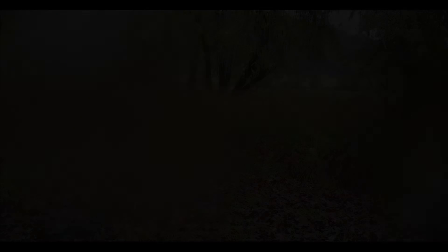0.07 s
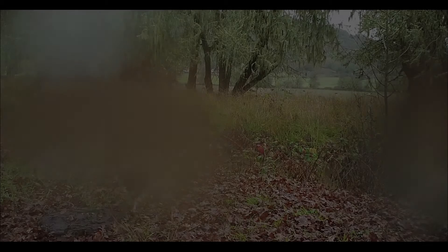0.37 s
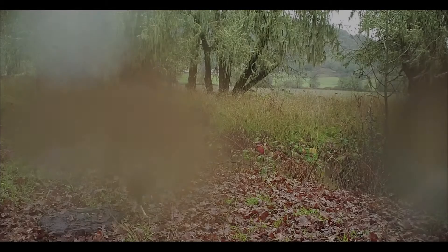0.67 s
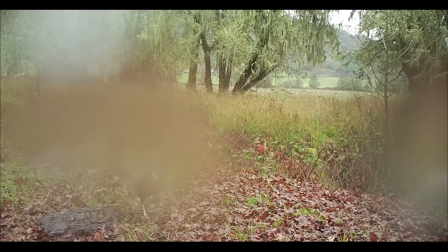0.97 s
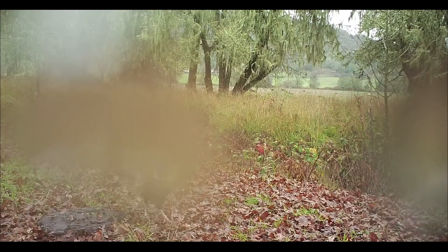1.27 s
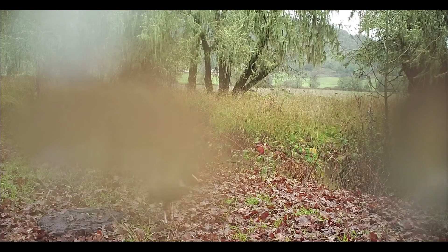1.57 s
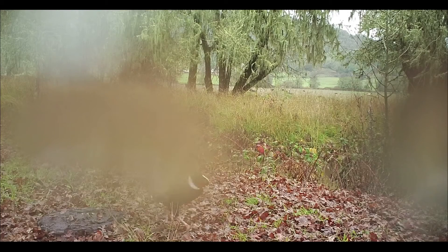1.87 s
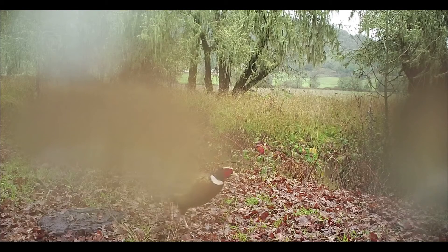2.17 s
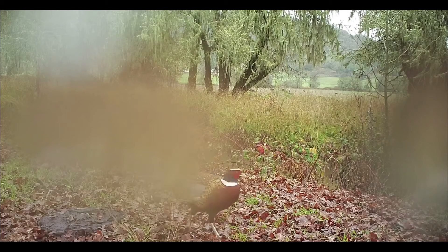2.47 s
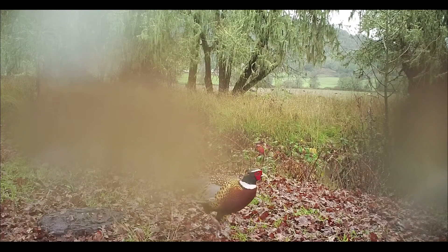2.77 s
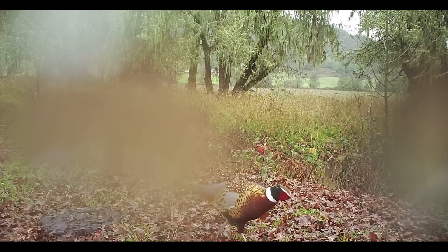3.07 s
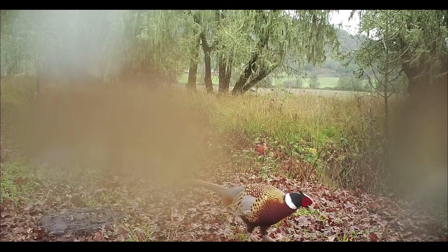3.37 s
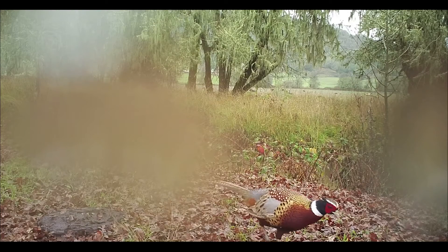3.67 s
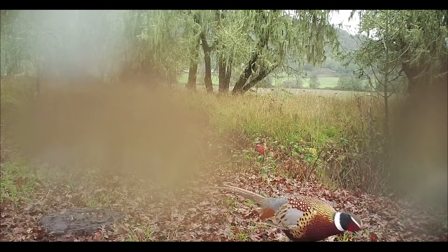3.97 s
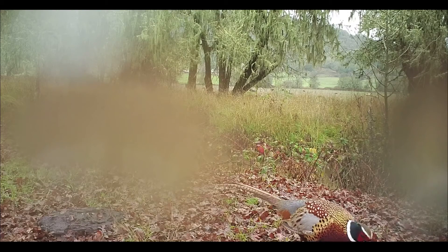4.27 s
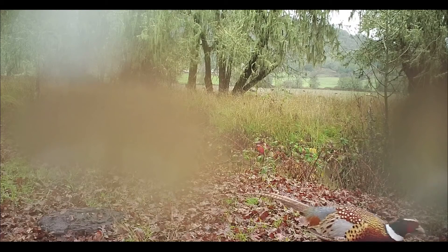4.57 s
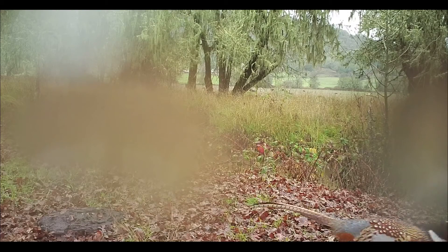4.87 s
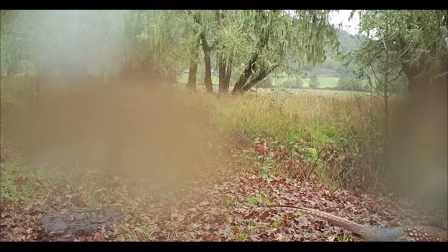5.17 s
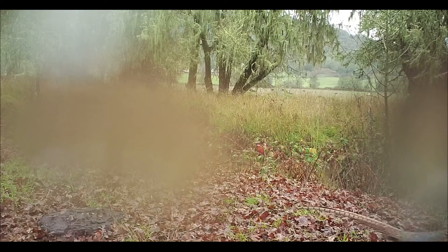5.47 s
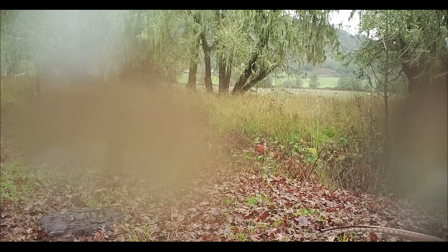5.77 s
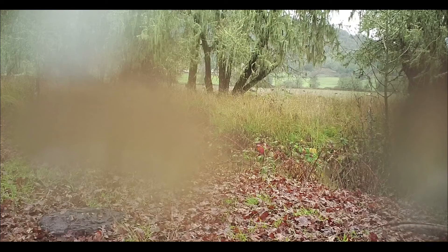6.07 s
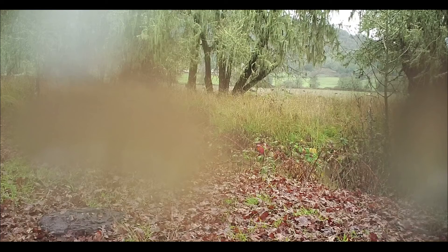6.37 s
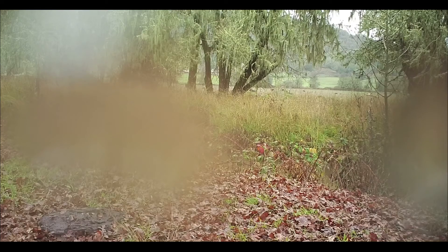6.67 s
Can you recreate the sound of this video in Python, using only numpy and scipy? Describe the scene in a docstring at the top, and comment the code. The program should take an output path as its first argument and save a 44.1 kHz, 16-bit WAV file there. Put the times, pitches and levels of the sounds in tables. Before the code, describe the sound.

At the quiet edge of a wood, an even hiss and a low, distant rumble fade in. Small, sharp ticks of leaves and drips come irregularly from all round. A pheasant picks its way through the fallen leaves, adding brief, soft rustles and occasional short knocks on twigs. A small bird gives a few very faint, thin chirps far off. The ticks and crackles sit mostly to the right.

```python
"""At the quiet, damp edge of a wood, a pheasant picks its way through fallen leaves.
Its steps rustle the leaves and knock on twigs. Small ticks come from all round, as leaves
snap or are hit by drips and ring briefly. Behind them are a small bird, a far rumble and an even hiss.
The camera's right microphone opening is the more sensitive one and rings near 6 kHz.
Its electronics whine faintly, and the sound fades in."""
import sys
import numpy as np
from scipy import signal
from scipy.fft import rfft, irfft
from scipy.io import wavfile

SR = 44100
rng = np.random.default_rng(int(sys.argv[2]) if len(sys.argv) > 2 else 0)


def persist_wave(psi):
    """Save psi, clipped to +-1, as 16-bit WAV."""
    counts = np.round(np.clip(psi, -1, 1) * 32767).astype(np.int16)
    wavfile.write(sys.argv[1], SR, np.atleast_2d(counts).T)


N = 301644
TIME = np.arange(N) / SR


def from_db(db):
    """Turn decibels into a number to multiply by."""
    return 10 ** (np.asarray(db) / 20)


def rms_one(x):
    """Scale a sound so that its average strength (rms) is 1."""
    return x / np.sqrt(np.mean(x ** 2) + 1e-20)


def energy_one(x):
    """Scale each channel so that its total energy is 1."""
    return x / np.linalg.norm(x, axis=1, keepdims=True)


def at_hz(points, hz, column=1):
    """Read a table between its frequencies, with all octaves equally wide."""
    table = np.array(points)
    return np.interp(np.log(hz), np.log(table[:, 0]), table[:, column])


def hump(middle_s, length_s):
    """A smooth rise and fall of height 1."""
    return np.exp(-np.pi * ((TIME - middle_s) / length_s) ** 2)


def drift(rate_hz):
    """A smooth random wobble of typical size 1."""
    step, warm_up = 40, 2000
    r = np.exp(-2 * np.pi * rate_hz * step / SR)
    noise = rng.standard_normal(N // step + warm_up + 2)
    slow = signal.lfilter([1], [1, -2 * r, r * r], noise)[warm_up:]
    return np.interp(np.arange(N) / step, np.arange(len(slow)), rms_one(slow))


def resonance(x, hz, width_hz):
    """Keep the sound near one pitch; the narrower the width, the longer it rings."""
    r = np.exp(-np.pi * width_hz / SR)
    angle = 2 * np.pi * min(hz, .45 * SR) / SR
    feedback = [1, -(1 + r * r) * np.cos(angle), r * r]
    return signal.lfilter(np.array([1, 0, -1]) * (1 - r * r) / 2, feedback, x + 1e-18)


def ring(x, hz, width_hz):
    """The same resonance twice, so less gets through on either side of the pitch."""
    return resonance(resonance(x, hz, width_hz), hz, width_hz)


def crackle(per_s, spread_db, low_hz, high_hz, damping, leaves=10):
    """Countless tiny snaps of uneven size, shared among leaves of different pitch."""
    sizes = from_db(spread_db * np.minimum(rng.exponential(1, N), 3)) * rng.choice([-1, 1], N)
    happens = rng.random(N) < per_s / SR
    snaps = sizes * happens * from_db(2 * rng.standard_normal((2, N)))   # each leans left or right
    which_leaf, out = rng.integers(0, leaves, N), np.zeros((2, N))
    for k, hz in enumerate(np.geomspace(low_hz, high_hz, leaves)):
        left, right = ring(snaps * (which_leaf == k), hz, damping * hz) * (low_hz / hz) ** .5
        out += [np.roll(left, k % 4 - 1), right]   # a tiny time shift gives the leaf a direction
    return np.array([rms_one(side) for side in out])


def air(left_db, right_db, rumble_hz, churn_db):
    """An even hiss and a far rumble that wavers and swells once in a gust."""
    # tone of the far noise: (frequency [Hz], relative left level [dB], relative right level [dB])
    spectrum = [(11.6, -77, -63), (19.3, -89, -63), (34.2, -69, -72.5), (57, -77.5, -69.5),
                (99.6, -80.5, -80), (167.6, -89.5, -85.5), (408, -94.5, -88), (1060, -97, -91.5),
                (2220, -100, -94), (4630, -102, -96), (6200, -103, -91.5), (9140, -104, -101),
                (15600, -105, -104)]
    # how alike the two sides are: (frequency [Hz], likeness [0 to 1])
    likeness = [(20, 0.093), (70, 0.61), (140, 0.83), (300, 0.32), (1400, 0.32), (5000, 0.17),
                (14000, 0.53)]
    hz = np.maximum(np.arange(N // 2 + 1) * SR / N, 1)
    shared, opposed = rfft(rng.standard_normal((2, N)))
    alike = at_hz(likeness, hz)
    noise = np.sqrt(1 + alike) * shared + np.sqrt(1 - alike) * opposed * [[1], [-1]]
    levels_db = [at_hz(spectrum, hz, column=1) + left_db, at_hz(spectrum, hz, column=2) + right_db]
    noise *= from_db(levels_db) * np.sqrt(SR) / 2
    bass = np.exp(-(hz / rumble_hz) ** 2)
    gust_db = 2.5 * hump(middle_s=1.15, length_s=1.2)
    rumble = irfft(noise * bass, N) * from_db(gust_db + churn_db * drift(11.8))
    hiss = irfft(noise * (1 - bass), N)
    return rumble + hiss


def whine(left_db, right_db, waver_hz):
    """The electronics give off two close, slightly unsteady high tones."""
    # tones of the electronics: (pitch [Hz], relative level [dB])
    tones = [(9799, -80), (9861, -80)]
    out = np.zeros(N)
    for hz, db in tones:
        pitch = hz + waver_hz * drift(17)
        out += from_db(db) * np.sqrt(2) * np.sin(2 * np.pi * np.cumsum(pitch) / SR)
    return out * from_db([[left_db], [right_db]])


def patter(level_db, left_db, waver_db):
    """Faint ticks from farther off never quite stop."""
    snaps = crackle(per_s=300, spread_db=1.6, low_hz=5500, high_hz=11300, damping=0.45)
    return snaps * from_db(waver_db * drift(14.4)) * from_db([[level_db + left_db], [level_db]])


def ticks(rows, level_db, size=1024):
    """A snap makes a leaf ring, with a dry crack on top; smaller slips follow as it settles."""
    left_db, left_spread_db = -8.5, 4.5   # left compared with right, and how much that varies
    settle_db, settle_s = -8, .002
    crack_shadow = from_db([[-10], [0]])   # less of the bright crack reaches the left side
    out, age = np.zeros((2, N + size)), np.arange(size) / SR
    for s, db, hz, width_hz, crack_db in rows:
        pan_db = left_db + left_spread_db * rng.standard_normal()
        slips = rng.standard_normal((2, size)) ** 3 * np.exp(-age / settle_s)
        force = from_db(settle_db) * energy_one(slips)
        force[:, 0] += 1   # the snap itself
        crack = energy_one(ring(force, hz=11600, width_hz=6900)) * crack_shadow
        leaf = energy_one(ring(np.roll(force, shift=4, axis=1), hz, width_hz))   # just after the crack
        start = min(int(s * SR), N)
        out[:, start:start + size] += (leaf + from_db(crack_db) * crack) * from_db([[db + pan_db], [db]])
    return from_db(level_db) * out[:, :N]


def soft_ticks(level_db, per_s, leaf_hz, width_hz, count=120):
    """Smaller leaves and drips tick at random moments and pitches."""
    times = np.cumsum(rng.exponential(1, count)) / per_s
    pitches = leaf_hz * 2 ** rng.uniform(-0.85, 0.5, count)
    return ticks([(s, 0, hz, width_hz, 0) for s, hz in zip(times, pitches)], level_db)


def leaf_snaps(level_db):
    """The loudest leaves snap one by one, each with its own short ring."""
    # snapping leaves: (time [s], relative level [dB], pitch [Hz], ring width [Hz], crack over ring [dB])
    snaps = [(0.3404, -28.5, 6500.0, 4000.0, -7.0), (0.4626, -29.5, 6200.0, 4000.0, -3.0),
             (0.7221, -32, 6800.0, 4000.0, -4.0), (0.7681, -35, 4500.0, 6000.0, -13.0),
             (0.8029, -30.5, 7500.0, 6000.0, 0), (0.8801, -30.5, 7000.0, 2500.0, -4.0),
             (1.0285, -37, 7500.0, 3000.0, -8.0), (1.2033, -33, 6000.0, 6000.0, 2),
             (1.3505, -40, 6000.0, 2500.0, -3.0), (1.5082, -33.5, 6733, 4000.0, -4.0),
             (1.5167, -35.5, 6750.0, 2500.0, -10.0), (1.5289, -28.0, 5260, 4000.0, -1),
             (1.6058, -30.5, 4000.0, 6000.0, -5), (1.6393, -34.5, 5750.0, 4000.0, -16.0),
             (1.6459, -32, 6000.0, 2500.0, -7.0), (1.6604, -35, 5500.0, 6000.0, -7.0),
             (1.6661, -38, 6250.0, 6000.0, -7.0), (1.7552, -34.5, 7000.0, 2500.0, -16.0),
             (1.907, -35, 6500.0, 6000.0, -16.0), (2.0414, -29.5, 5900.0, 6000.0, -1),
             (2.2675, -24.5, 6140, 5050, -8.0), (2.3894, -28.5, 5700.0, 3500.0, -3.0),
             (2.4073, -37, 7250.0, 6000.0, -16.0), (2.4375, -38, 7800.0, 1200.0, -12.0),
             (2.4957, -31, 5750.0, 4000.0, -4.0), (2.5034, -28, 7550, 3470, -3),
             (2.5294, -33, 5000.0, 1500.0, -10.0), (2.6905, -33, 7500.0, 6000.0, -4.0),
             (2.716, -30.5, 6300.0, 2500.0, -5.0), (2.7604, -29, 8000.0, 6000.0, -10.0),
             (2.8289, -35, 5014, 1500.0, 2), (2.8591, -35, 5500.0, 2500.0, -10.0),
             (2.8968, -35, 6100, 1500.0, 5), (3.0274, -35, 6750.0, 4000.0, -1.0),
             (3.4317, -31, 7250.0, 6000.0, -7.0), (3.5002, -31.0, 4258, 4000.0, -4.0),
             (3.5175, -32.5, 6000.0, 3000.0, -12.0), (3.6075, -32.5, 6000.0, 6000.0, -8.0),
             (3.6979, -33, 6500.0, 2000.0, -3.0), (3.876, -31, 5247, 6000.0, -10.0),
             (3.9079, -29.5, 6200.0, 4500.0, -2), (4.021, -32, 8600, 4000.0, -7.0),
             (4.2024, -30, 6400.0, 3000.0, -6), (4.4131, -28.5, 6200.0, 1500.0, -2),
             (4.4399, -30.5, 6200, 1500.0, -4.0), (4.4752, -36, 5750.0, 4012, -4.0),
             (4.5399, -30, 4000.0, 6000.0, -16.0), (4.5457, -30.5, 6000.0, 6000.0, -10.0),
             (4.5694, -32, 8500.0, 5000.0, -11.0), (4.5852, -34.0, 6250.0, 4000.0, -10.0),
             (4.6359, -31.5, 4000.0, 2500.0, -1), (4.7162, -32, 8538, 6000.0, -2.0),
             (4.7958, -33, 6500.0, 6000.0, -16.0), (4.8907, -27, 5100, 4000.0, -1),
             (5.0899, -33.0, 8000.0, 5000.0, -1.0), (5.1095, -31, 7200, 4017, -16.0),
             (5.1373, -34, 9290, 900.0, 1.0), (5.1638, -32, 6700, 4000.0, -1.0),
             (5.1823, -31.5, 6000.0, 4000.0, -7.0), (5.1995, -35.5, 6000.0, 6000.0, -4.0),
             (5.2641, -27.5, 8100, 4008, -2), (5.3486, -33.5, 6000.0, 2500.0, -6.0),
             (5.3831, -37, 7250.0, 2500.0, 1), (5.4191, -27, 6823, 4000.0, 0),
             (5.4969, -37.0, 6470, 900.0, -12.0), (5.5527, -35, 6900, 2500.0, -6),
             (5.6038, -43, 7750.0, 6000.0, -16.0), (5.6301, -36.0, 7000.0, 6000.0, -13.0),
             (5.6421, -39, 5250.0, 6000.0, -10.0), (5.7481, -38, 6250.0, 4000.0, -16.0),
             (5.7569, -32.0, 7650, 6024, -6), (5.821, -29, 4800.0, 2500.0, -10.0),
             (5.9316, -30.5, 7500.0, 6000.0, -16.0), (5.9663, -31, 8000.0, 4000.0, -4.0),
             (5.9791, -30, 6300, 2000.0, -10.0), (6.2437, -34, 6623, 4000.0, -14.0),
             (6.2593, -37, 6250.0, 4000.0, -13.0), (6.3427, -35, 4000.0, 1500.0, -4.0),
             (6.372, -39.0, 6250.0, 900.0, -1.0), (6.6059, -33, 6200.0, 4500.0, -5.0),
             (6.6629, -30, 7000.0, 5000.0, -10.0), (6.7215, -38, 6000.0, 900.0, -3.0),
             (6.7905, -33, 8282, 1200.0, -1)]
    return ticks(snaps, level_db)


def bird(left_db, blur, flatten=0.55):
    """A small, far bird: each chirp slides up and flattens out, a little blurred by the leaves."""
    # thin chirps: (middle [s], length [s], pitch [Hz], rise [Hz], relative level [dB])
    chirps = [(1.086, 0.0061, 5250, 695, -52), (3.417, 0.011, 4970, 250, -57),
              (5.155, 0.0073, 5180, 450, -46.5), (6.451, 0.005, 4970, 350, -53),
              (6.463, .005, 5028, 150, -56)]
    out, scatter = np.zeros(N), blur * drift(150)
    for s, length, hz, rise_hz, db in chirps:
        along = (TIME - s) / length
        pitch = hz + rise_hz * (along - flatten * along ** 2)
        loudness = from_db(db) * np.exp(-2 * along ** 2)
        out += loudness * np.sin(2 * np.pi * np.cumsum(pitch) / SR + scatter)
    return out * from_db([[left_db], [0]])


def twigs(level_db, left_db, size=1024):
    """A twig that is stepped on gives one short, woody knock, lower than a leaf's tick."""
    # knocking twigs: (time [s], relative level [dB], pitch [Hz], ring width [Hz])
    knocks = [(1.6058, -42, 2500, 2500), (2.034, -34.5, 670, 200), (2.2682, -29.5, 1490, 2500),
              (2.3887, -33, 3520, 1000), (2.5033, -38, 1750, 2000), (2.715, -34, 2670, 900),
              (3.518, -33.5, 1751, 1000), (4.4129, -35, 3200, 900), (4.8901, -29.5, 2890, 3000),
              (5.1001, -36, 2040, 1000), (5.2639, -30, 3500, 1100), (5.4193, -32.5, 1910, 1200)]
    out, blow = np.zeros(N + size), signal.unit_impulse((1, size))
    for s, db, hz, width_hz in knocks:
        start = int(s * SR)
        out[start:start + size] += from_db(db) * energy_one(ring(blow, hz, width_hz))[0]
    return out[:N] * from_db([[level_db + left_db], [level_db]])


def rustles(level_db, left_db):
    """The pheasant pushes leaves aside; each push sets off a short swell of tiny snaps."""
    # pushes into the fallen leaves: (middle [s], length [s], relative level [dB])
    pushes = [(1.66, 0.04, -55), (2.41, 0.065, -58), (3.07, 0.071, -58.5), (3.236, 0.045, -56),
              (3.69, .029, -57), (4, 0.12, -56.5), (4.583, 0.06, -55), (4.98, 0.031, -55),
              (5.178, 0.039, -55), (5.613, 0.054, -60), (5.762, 0.019, -56), (6.248, 0.05, -57),
              (6.728, 0.042, -58)]
    power = sum(from_db(db) ** 2 * hump(s, length) for s, length, db in pushes)
    snaps = crackle(per_s=650, spread_db=2.4, low_hz=6200, high_hz=10500, damping=0.35)
    return np.sqrt(power) * snaps * from_db([[level_db + left_db], [level_db]])


def microphone_openings(x, left_db, right_db):
    """Each microphone opening adds its own ring to the sound that reaches it."""
    return x + from_db([[left_db], [right_db]]) * resonance(x, hz=6250, width_hz=1076)


def scene():
    """Leaves, twigs and bird ring the microphone openings; far noise and whine are added after."""
    background = air(left_db=2.9, right_db=1.62, rumble_hz=250, churn_db=2.5)
    background += whine(left_db=-1.5, right_db=2.5, waver_hz=5.0)
    wood = patter(level_db=-66.0, left_db=-1.0, waver_db=3.0)
    wood += soft_ticks(level_db=-40.0, per_s=14.0, leaf_hz=6400, width_hz=3500)
    wood += leaf_snaps(level_db=1.0)
    wood += bird(left_db=-5.0, blur=1.0)
    wood += twigs(level_db=3.0, left_db=-2.0)
    wood += rustles(level_db=-2.0, left_db=-2.0)
    wood[0] = np.roll(wood[0], shift=2)   # these lie a little to the right, so the left hears them later
    return microphone_openings(wood, left_db=-1, right_db=12.5) + background


def record(dry):
    """The electronics shift the wave slightly off zero; it fades in and the highest treble is cut."""
    # the fade-in: (time [s], gain [factor])
    fade = [(0, 0.13), (.4, 0.43), (.85, 0.66)]
    offset, cutoff_hz = -0.048, 15400
    faded = (dry + offset) * np.interp(TIME, *np.transpose(fade))
    return signal.sosfilt(signal.ellip(12, .1, 80, cutoff_hz, fs=SR, output="sos"), faded)


dry = scene()
out = record(dry)
persist_wave(out)
```